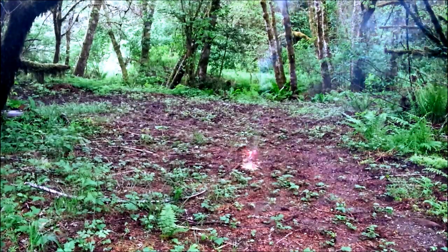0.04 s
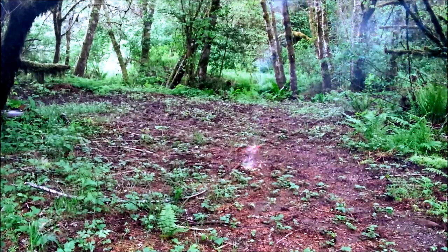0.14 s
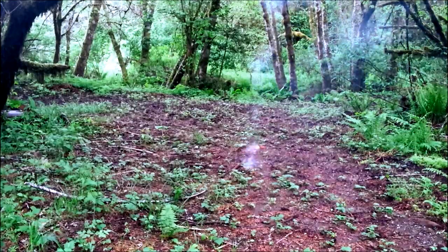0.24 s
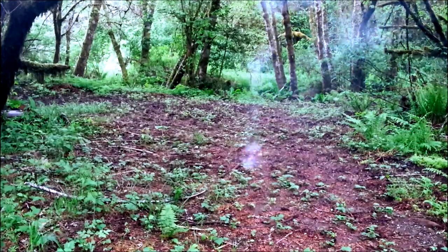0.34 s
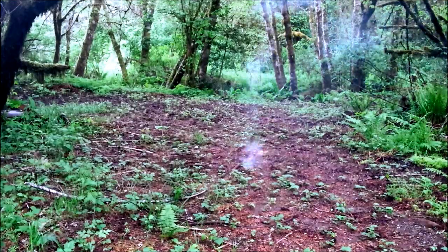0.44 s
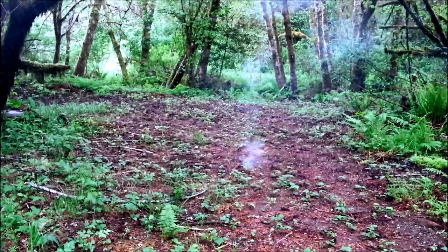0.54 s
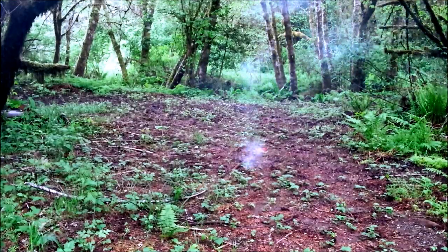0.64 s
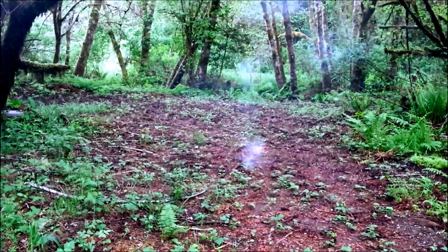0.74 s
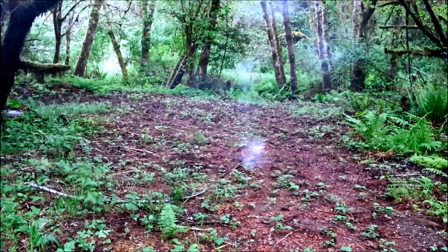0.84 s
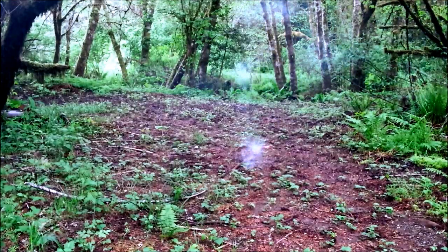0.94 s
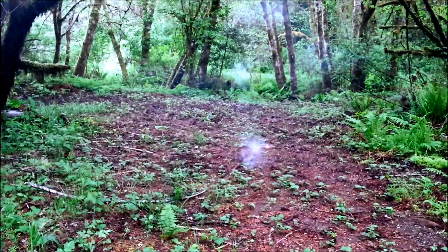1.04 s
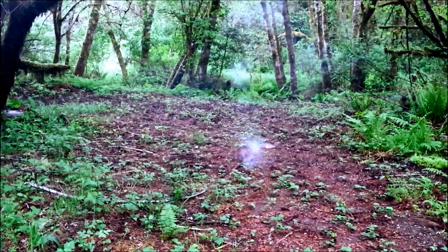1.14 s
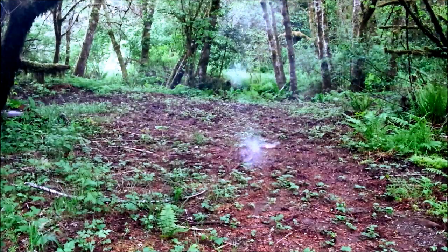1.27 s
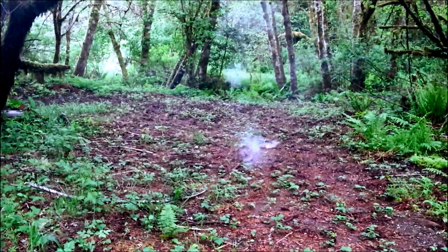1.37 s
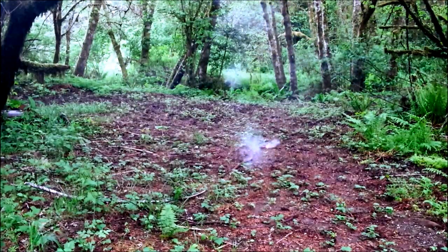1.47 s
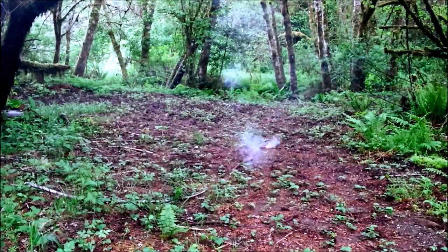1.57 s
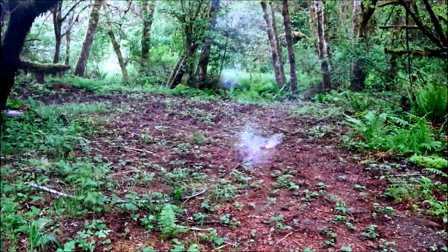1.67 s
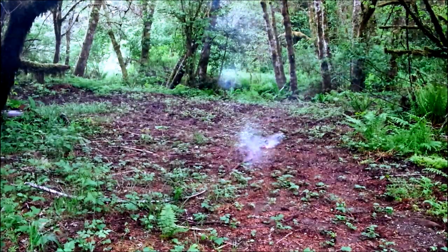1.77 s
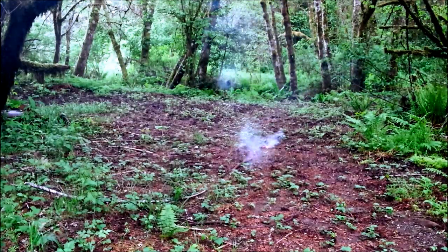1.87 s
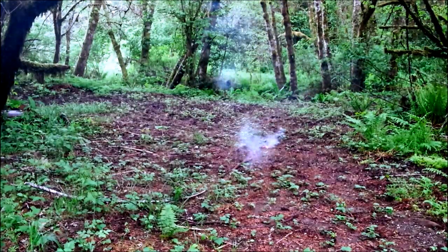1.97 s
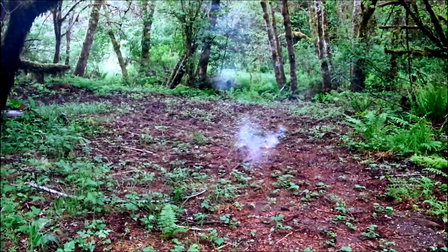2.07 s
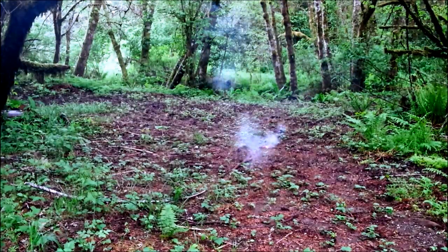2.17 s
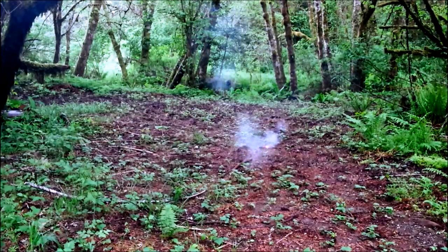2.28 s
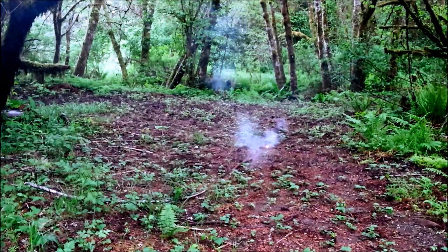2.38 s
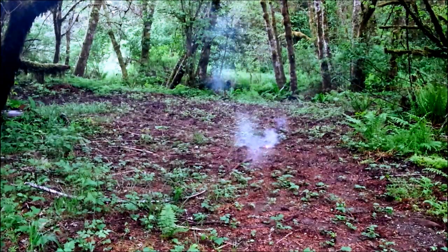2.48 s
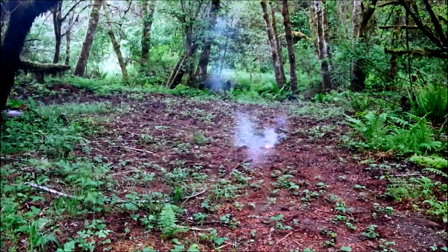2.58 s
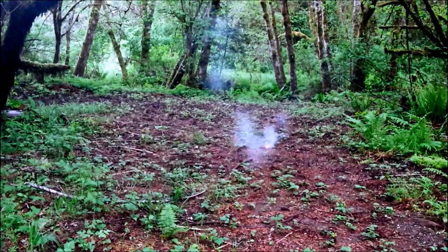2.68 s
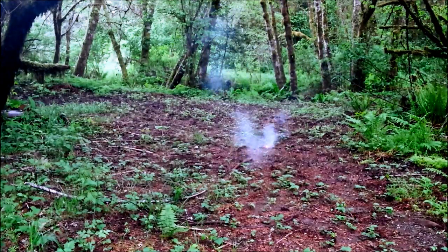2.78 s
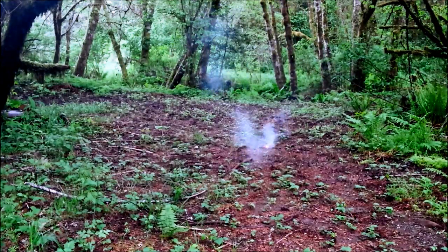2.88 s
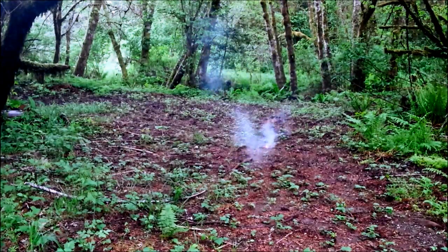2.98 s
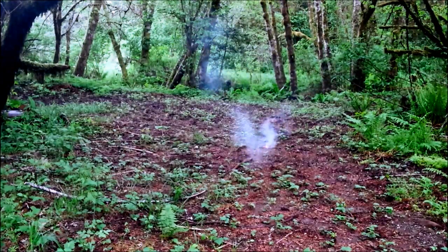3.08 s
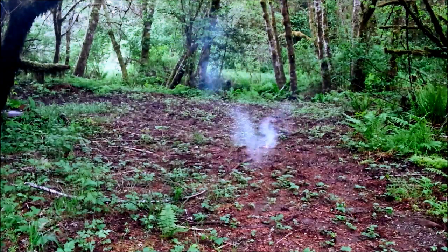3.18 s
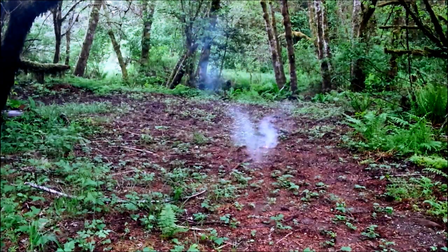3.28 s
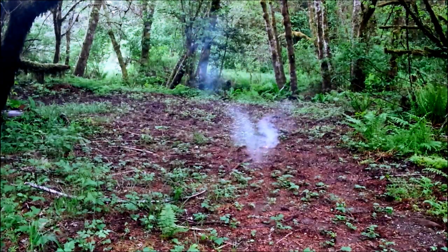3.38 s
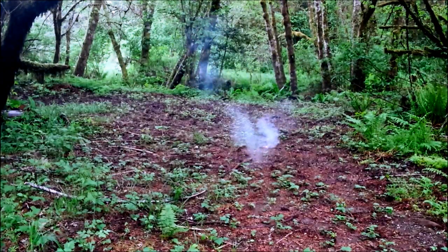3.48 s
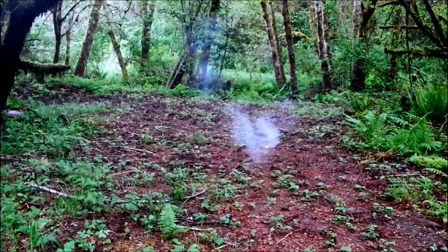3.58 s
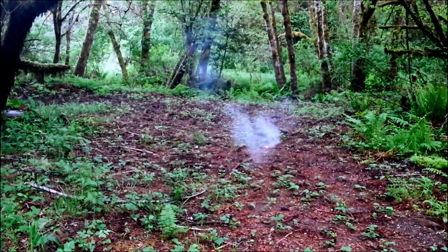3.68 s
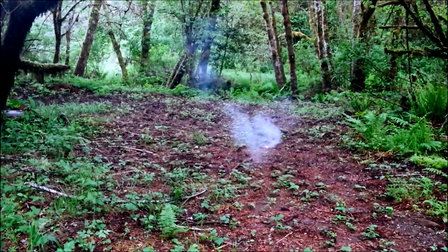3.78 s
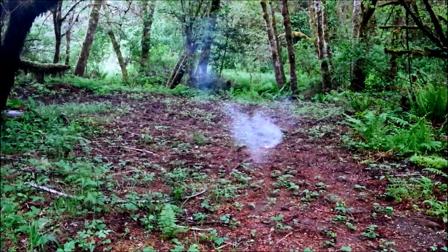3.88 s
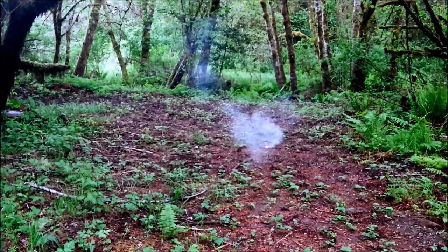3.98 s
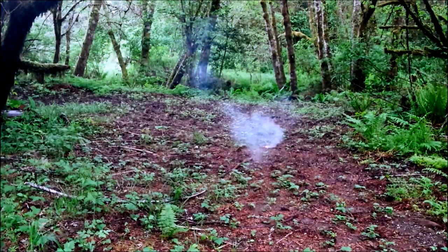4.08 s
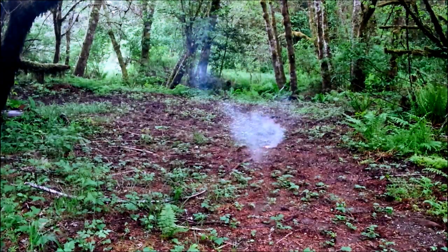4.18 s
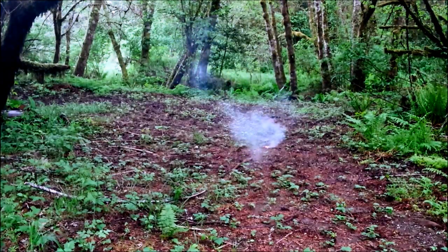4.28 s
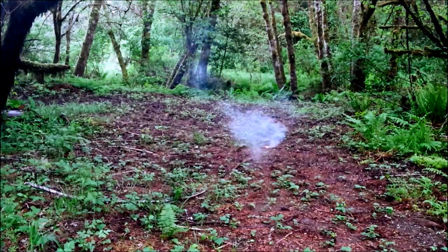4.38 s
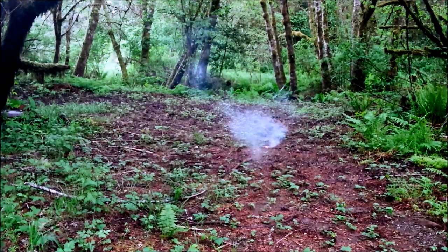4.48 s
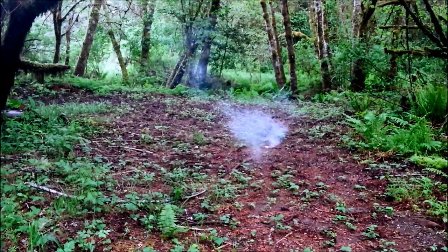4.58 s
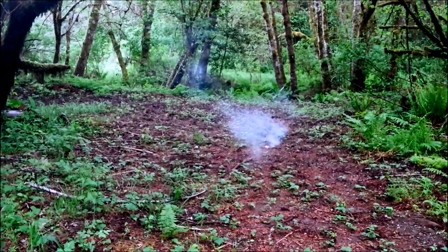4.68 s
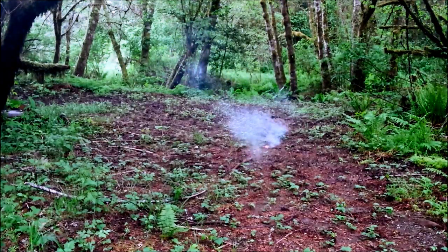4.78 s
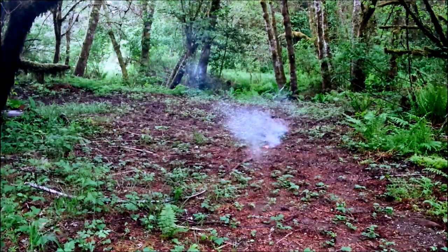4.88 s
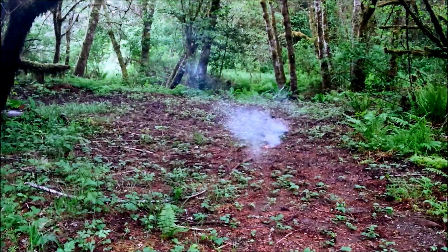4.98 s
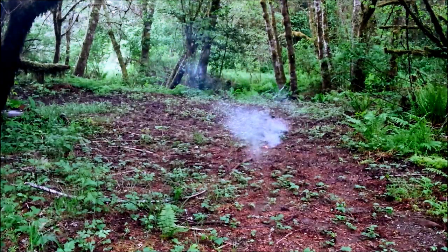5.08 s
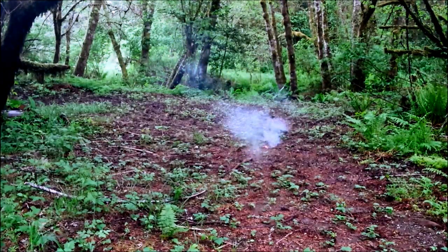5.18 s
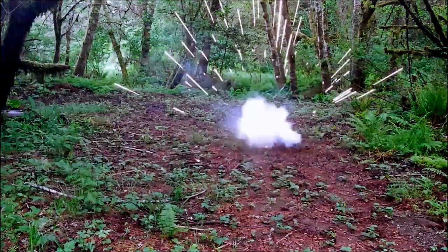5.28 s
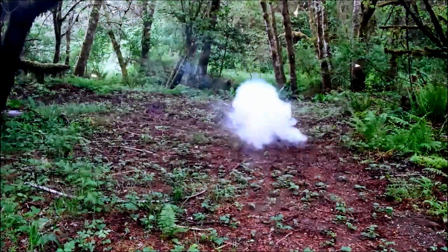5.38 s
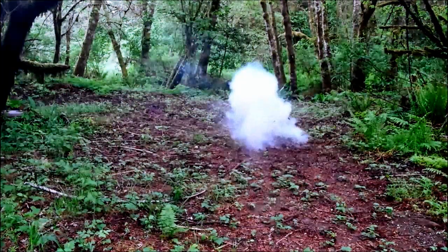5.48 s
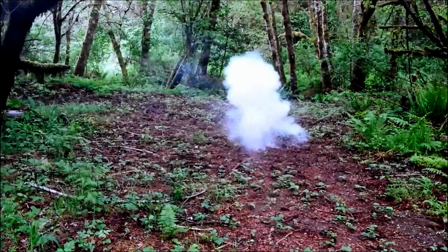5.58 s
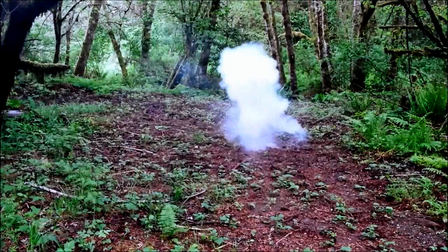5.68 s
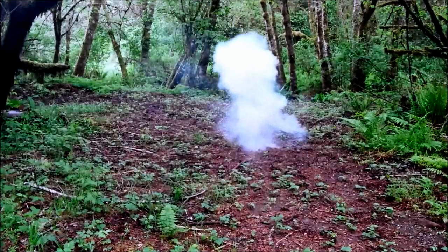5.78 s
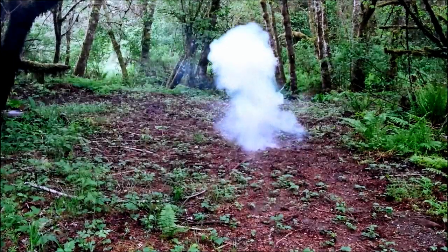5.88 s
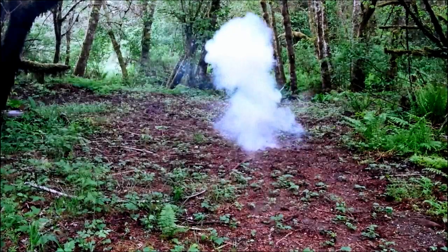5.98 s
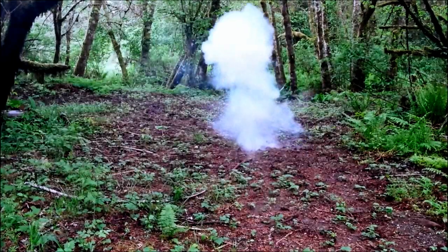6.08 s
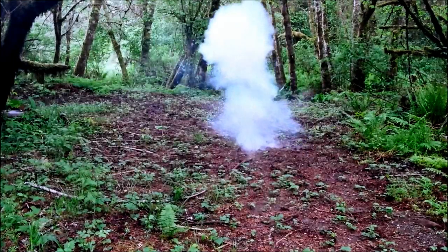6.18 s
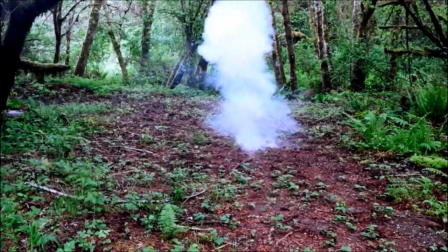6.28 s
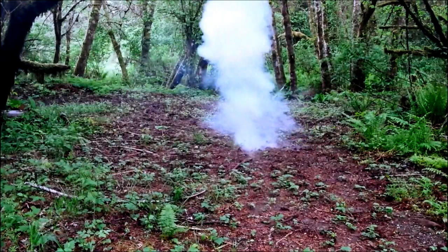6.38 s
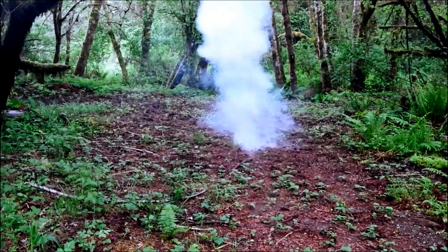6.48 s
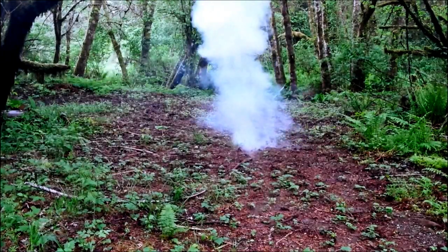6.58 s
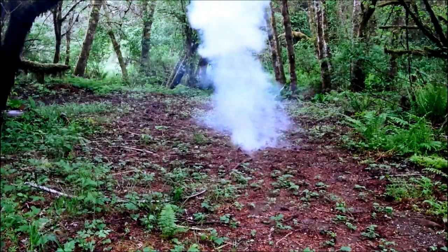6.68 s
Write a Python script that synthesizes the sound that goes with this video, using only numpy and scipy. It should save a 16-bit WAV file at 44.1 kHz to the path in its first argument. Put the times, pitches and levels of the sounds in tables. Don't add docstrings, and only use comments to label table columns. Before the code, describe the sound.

A quiet wood, heard through a phone's two close-spaced microphones some metres from a burning firecracker. From 0 s a faint, even fizz of fuse and wet leaves, its treble flickering slightly. Over it, small twig snaps and spits cluster at 0.5-0.9 s, with a hollow woody knock near 0.67 s, and a low water-drop thump on the right at 1.27 s. Sparse ticks follow; from 3.2 s crackles and knocks get busier, with duller scuffing knocks around 3.9-4.2 s, a very sharp loud snap at 4.65 s and another click at 5.1 s. At 5.23 s one abrupt, clipped bang bursts out. Dense stereo echoes roar back from leaves, branches and trunks, bright at first, then darker and lumpy, fading over about a second. The hiss, ducked by gain control and now duller, creeps back until 6.7 s, with barely audible ticks.

```python
import sys
import numpy as np
from scipy import signal
from scipy.fft import rfft, irfft, next_fast_len
from scipy.io import wavfile
from scipy.ndimage import uniform_filter1d

SR = 44100
rng = np.random.default_rng(int(sys.argv[2]) if len(sys.argv) > 2 else 0)


def waveform_to_disk(signal):
    frames = np.transpose(np.atleast_2d(signal))
    scaled = np.clip(frames, -1, 1) * 32767
    samples = np.round(scaled).astype(np.int16)
    wavfile.write(sys.argv[1], SR, samples)


def decibels_to_gain(level_db):
    exponent = np.asarray(level_db, float) / 20
    return 10 ** exponent


N = 297234
BURST_S = 5.2270
SPACING = 18


def colour(x, points):
    hz, db = np.transpose(points)
    size = next_fast_len(x.shape[-1])
    f = np.maximum(np.arange(size // 2 + 1) * SR / size, 1)
    response = decibels_to_gain(np.interp(np.log(f), np.log(hz), db))
    return irfft(rfft(x, size) * response, size)[..., :x.shape[-1]]


def level(x, db):
    return x * decibels_to_gain(db) / np.sqrt(np.mean(x ** 2))


def band(x, hz, width):
    return signal.lfilter(*signal.iirpeak(hz, hz / width, SR), x)


def curve(table):
    s, value = np.transpose(table)
    return np.interp(np.arange(N) / SR, s, value)


def walk(rate_hz):
    k = int(SR / rate_hz)
    steps = np.repeat(rng.standard_normal(N // k + 1), k)
    return uniform_filter1d(uniform_filter1d(steps, k), k)[:N]


def arrive(x, side):
    lag = int(round(side * SPACING / 2))
    return np.array([np.roll(x, lag), np.roll(x, -lag)])


def all_round(size, left_db, right_db, apart_db, spike_db):
    spikes = np.minimum(rng.exponential(size=(10, size)), 5)
    grains = rng.standard_normal((10, size)) * decibels_to_gain(spike_db * spikes)
    weight = decibels_to_gain([left_db, 0, 0, 0, 0, 0, 0, right_db])
    shared = sum(w * arrive(g, s) for g, w, s in zip(grains, weight, np.linspace(-1, 1, 8)))
    return level(shared + decibels_to_gain(apart_db) * grains[8:], 0)


# t/s, gain/dB
GAIN = [
    (5.214, -8.5),
    (5.219, -11.5),
    (5.35, -15),
    (5.42, -21.5),
    (5.47, -21),
    (5.9, -23),
    (6.3, -26),
    (6.74, -17),
]


def gain_control_db():
    return curve(GAIN)


SHOCK_DB, SUCTION_S, REBOUND_S = 5, .0015, .0007


def shock_front(t):
    corners_s = np.cumsum([0, .00005, .0003, SUCTION_S, .0003, REBOUND_S, .0008])
    return decibels_to_gain(SHOCK_DB) * np.interp(t, corners_s, [0, 0.46, -0.15, -1.13, 0.47, -0.22, -0.23])


# level/dB at the burst, fade/dB per s
LEAVES, BRANCHES, TRUNKS = (9.3, 36.2), (-0.82, 19.9), (1.92, 12.34)
BUILD_UP_S = 0.015
STAND_S = 0.023
AIR_DB_PER_S = 33
RUMBLE_DB_PER_S = 4.5
# f/Hz, level/dB per Hz
ECHO_COLOUR = [(40, 0), (100, 2), (250, 2.5), (500, 1), (900, 2), (1500, 3.5), (3000, 0.5), (5500, -2),
               (9000, -6), (15000, -14.5)]
# t/s, level/dB
STANDS = [(5.228, 5.5), (5.268, -2.5), (5.315, 7), (5.36, 4.5), (5.462, 5), (5.545, 4.5), (5.63, 4),
          (5.7, 5.5), (5.8, 5.5), (5.93, 2), (6.048, 3)]


def echoes(t, start):
    size = next_fast_len(len(t))
    leaf_db, branch_db, trunk_db = (db - fade * t for db, fade in (LEAVES, BRANCHES, TRUNKS))
    leaf_db = leaf_db - 9 * np.exp(-t / BUILD_UP_S)
    trunk_db = trunk_db + sum(db * np.exp(-((t + BURST_S - s) / STAND_S) ** 2) for s, db in STANDS)
    gain_db = gain_control_db()[start:]
    noise = all_round(size, left_db=-1, right_db=4, apart_db=4.0, spike_db=1.5)
    spectrum = rfft(colour(noise, ECHO_COLOUR))
    octave = np.log2(np.maximum(np.arange(size // 2 + 1) * SR / size, 1) / 30)
    out = 0
    for k in np.arange(0, 9.6, .5):
        hz = 30 * 2 ** k
        trunk, leaf = np.clip([np.log2(1700 / hz) / 1.46, np.log2(hz / 1600) / 2.38], 0, 1)
        scatter_db = leaf * leaf_db + (1 - trunk - leaf) * branch_db + trunk * trunk_db
        loss = AIR_DB_PER_S * (hz / 10000) ** 2 + RUMBLE_DB_PER_S * max(np.log2(200 / hz), 0)
        lumps_db = 1.5 * trunk * walk(14)[start:] + .8 * walk(25)[start:]
        window = np.clip(1 - 2 * np.abs(octave - k), 0, 1)
        echo = irfft(spectrum * window, size)[:, :len(t)]
        out = out + decibels_to_gain(scatter_db - loss * t + lumps_db + gain_db) * echo
    return decibels_to_gain(13) * out


def burst():
    start = int(BURST_S * SR)
    t = np.arange(N - start) / SR
    return np.pad(echoes(t, start) + shock_front(t), ((0, 0), (start, 0)))


RISE_MS, RISE_POWER = .011, 1.5


def grain_bursts(table):
    out = np.zeros((2, N))
    t_ms = np.arange(SR // 5) / SR * 1000
    for s, db, t60_ms, bright in table:
        attack_ms = RISE_MS * t60_ms ** RISE_POWER
        rise = 1 - np.exp(-t_ms / max(attack_ms, .01))
        grains = rng.standard_normal((2, len(t_ms))) * rise * decibels_to_gain(-60 * t_ms / t60_ms)
        grains[:, 0] = 3 * (attack_ms < .25)
        grains = band(grains, 2000 * 5.43 ** np.clip(bright, 0, 1), 3700)
        part = out[:, int(s * SR):][:, :len(t_ms)]
        part += (decibels_to_gain(db) * grains / np.abs(grains).max())[:, :part.shape[1]]
    return np.array([out[0], np.roll(out[1], SPACING // 3)])


# t/s, peak/dB, t60/ms, brightness 0-1
SNAPS = [(.50, -31, 7, .8), (.63, -34, 8, .8), (.662, -31.5, 10, .7), (.868, -30, 10, .4),
         (.907, -27, 8, .53), (1.64, -38, 12, .85), (1.91, -37.5, 10, .95), (2.176, -31, 14, 0.77),
         (2.22, -40, 10, .95), (2.37, -42, 12, .99), (3.267, -25, 16, 0.6), (3.44, -29, 7, .9),
         (3.6244, -17, 4.3, 0.5), (3.629, -28, 8, .6), (4.177, -23, 4, 0.6), (4.289, -25, 5, .6),
         (4.6528, -6.5, 2.9, 0.95), (4.9, -35.5, 10, .9), (5.089, -29.5, 8, .95), (5.098, -16, 2.2, 0),
         (6.24, -44, 7, .95)]


def twig_snaps():
    return grain_bursts(SNAPS)


# t/s, peak/dB, t60/ms, brightness 0-1
SPITS = [(.04, -30, 36, 0.78), (.315, -35, 79, 0.88), (.729, -28, 58, 0.56), (.826, -29, 31, 0.9),
         (.851, -29.5, 50, 0.26), (2.099, -33, 25, 0.4), (2.547, -30, 40, .6), (2.577, -27.5, 35, 0.43),
         (2.615, -32, 40, 0.7), (3.018, -31, 140, 0.63), (3.088, -29, 17, 0.55), (3.544, -28, 20, .3),
         (3.636, -31, 30, 0.7), (3.923, -26, 96, 0.38), (4.0, -30, 65, .3), (4.148, -25, 155, 0.05),
         (4.792, -32, 56, 0.7), (4.945, -30, 29, .65), (4.951, -26.5, 120, 0.4), (6.65, -49.5, 56, 1)]


def fuse_spits():
    return grain_bursts(SPITS)


RING_CYCLES, RING_MIN_MS = 11.4, 8
HEAVY = .15
# t/s, peak/dB, f/Hz, shove/ms
KNOCKS = [(.661, -24, 394, 4), (0.666, -14.5, 610, 1), (.667, -23, 1130, 1), (.677, -22.5, 447, 9.6),
          (.96, -22.5, 1300, 3.4), (1.119, -31, 283, 2.3), (1.41, -32, 450, 2), (1.881, -29.5, 594, 5),
          (3.2645, -21, 5800, 5), (3.499, -26.5, 1200, .5), (3.505, -18, 1260, .46), (3.6244, -21, 5200, 3),
          (3.924, -19, 475, 26), (3.93, -31, 800, 34), (4.15, -31, 800, 50), (3.95, -25.5, 367, 36),
          (4.148, -23.5, 380, 35), (4.165, -21, 402, 43), (4.172, -34.5, 204, 92), (4.202, -31, 367, 98),
          (4.952, -28, 503, 22)]


def knocks():
    out = np.zeros(N)
    t_ms = np.arange(SR // 4) / SR * 1000
    for s, db, hz, shove_ms in KNOCKS:
        t60_ms = max(1000 * RING_CYCLES / hz, RING_MIN_MS) + HEAVY * shove_ms
        scrape = rng.standard_normal(len(t_ms)) * np.sqrt(np.clip(1 - t_ms / shove_ms, 0, 1))
        push = (t_ms == 0) * (shove_ms < 10) + 0.22 * scrape
        mode = np.sin(2 * np.pi * hz * t_ms / 1000) * decibels_to_gain(-60 * t_ms / t60_ms)
        ring = signal.fftconvolve(push, mode)[:len(t_ms)]
        ring = band(band(ring, hz, 2 * hz), hz, 2 * hz)
        out[int(s * SR):][:len(t_ms)] += decibels_to_gain(db) * ring / np.abs(ring).max()
    return arrive(out, -0.16)


DROP_S, DROP_STEP_DB = 1.2739, -10.5


def water_drop():
    return np.outer([0, 1], decibels_to_gain(DROP_STEP_DB) * (np.arange(N) >= DROP_S * SR))


FUSE_OUT_DB = -8.5
# t/s, level/dB
HISS = [
    (0.0, -38),
    (0.9, -37.5),
    (1.36, -38),
    (2.42, -38.5),
    (4.21, -37.5),
    (4.61, -37.5),
    (5.2, -36.5),
]
# f/Hz, level/dB per Hz
HISS_COLOUR = [(30, -2), (100, -8), (300, -4.5), (700, -1), (1500, -2), (3000, -4), (4200, -4.5),
               (6000, -5.5), (7500, -8.5), (9000, -7), (11000, -14), (13000, -14.5), (15000, -19.5)]


def high_pass(x, hz):
    return signal.sosfilt(signal.butter(2, hz, "high", fs=SR, output="sos"), x)


def hiss():
    fizz = colour(all_round(N, left_db=3, right_db=0, apart_db=1, spike_db=3), HISS_COLOUR)
    treble = high_pass(fizz, 2500)
    sizzle = colour(high_pass(fizz, 7000), [(6000, -23.5), (9000, -7)])
    flicker_db = .8 * walk(9) + 1.2 * walk(30)
    burnt = np.arange(N) > BURST_S * SR
    fizz = fizz + (decibels_to_gain(flicker_db) - 1) * treble + (decibels_to_gain(FUSE_OUT_DB * burnt) - 1) * sizzle
    return level(fizz, 0) * decibels_to_gain(curve(HISS) + 5.5)


def scene():
    quiet = (hiss() + knocks()) * decibels_to_gain(gain_control_db())
    return burst() + twig_snaps() + fuse_spits() + quiet + water_drop()


LOW_CUT_HZ, LOW_CUT_Q = 86, 0.8
# f/Hz, width/Hz, gain/dB
PORTS = [
    [(6400, 1250, 12.5)],
    [(6000, 1000, -3.5), (8000, 1900, 5)],
]


def capsules(x):
    w = 2 * np.pi * LOW_CUT_HZ
    out = signal.lfilter(*signal.bilinear([1, 0, 0], [1, w / LOW_CUT_Q, w * w], SR), x)
    for c, modes in enumerate(PORTS):
        for hz, width, db in modes:
            out[c] += (decibels_to_gain(db) - 1) * band(out[c], hz, width)
    return out


RIGHT_DB = -1
CEILING, OFFSET = .9, -.0004


def overload(x):
    return np.clip(x * decibels_to_gain([[0], [RIGHT_DB]]), -CEILING, CEILING)


FAINT_DB, LOUD_DB, MONO_HZ, MONO_SIDE = -97, -58, 7560, 0.45
MASK_DB, MASK_RISE = -16, .2
MASK_DB_PER_KHZ = 2.2
MASK_JITTER_DB, MASK_WANDER_DB = 4.5, 2.5


def thin_treble(x):
    hz, _, z = signal.stft(x, SR, nperseg=2048)
    power = np.abs(z) ** 2
    frames = power.shape[-1]
    lead = power[:, (hz > 4000) & (hz < 8000)].mean(axis=1, keepdims=True)
    loudness = lead / decibels_to_gain(2 * LOUD_DB)
    soft = loudness < 1
    bands = np.repeat(power[:, :-1].reshape(2, -1, 8, frames).mean(axis=2), 8, axis=1)
    jitter = decibels_to_gain(2 * MASK_JITTER_DB * rng.standard_normal((128, frames)))
    bands *= np.repeat(jitter, 8, axis=0) ** soft
    wander = uniform_filter1d(rng.standard_normal(frames), size=3) * np.sqrt(3)
    rise_db = MASK_DB_PER_KHZ * np.maximum(hz[:-1, None] / 1000 - 10, 0)
    bar_db = MASK_DB + (rise_db + MASK_WANDER_DB * wander) * soft
    bar = lead * np.minimum(loudness, decibels_to_gain(28)) ** MASK_RISE * decibels_to_gain(2 * bar_db) + decibels_to_gain(2 * FAINT_DB)
    z[:, :-1] *= (bands > bar) | (hz[:-1, None] < 8500)
    mono = (loudness.mean(axis=0) > 1) & (hz[:, None] > MONO_HZ)
    mid = (z[0] + z[1]) / 2 * np.where(mono, 1.3, 1)
    side = (z[0] - z[1]) / 2 * np.where(mono, MONO_SIDE, 1)
    return signal.istft(np.array([mid + side, mid - side]), SR, nperseg=2048)[1][:, :N]


def low_pass(x):
    return signal.sosfilt(signal.butter(12, 14870, fs=SR, output="sos"), x)


def record(dry):
    mix = thin_treble(overload(capsules(dry))) + OFFSET
    return low_pass(mix)


dry = scene()
out = record(dry)
waveform_to_disk(out)
```